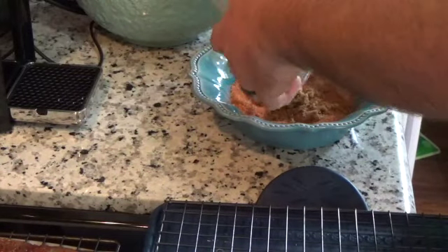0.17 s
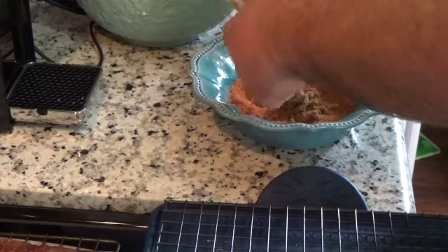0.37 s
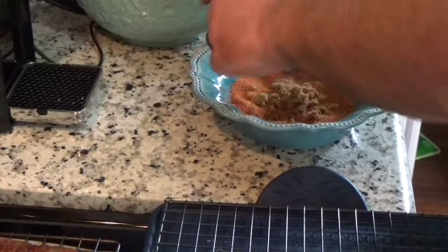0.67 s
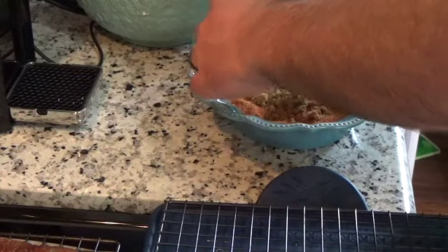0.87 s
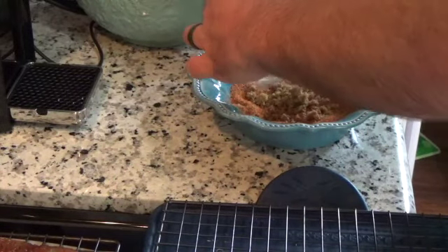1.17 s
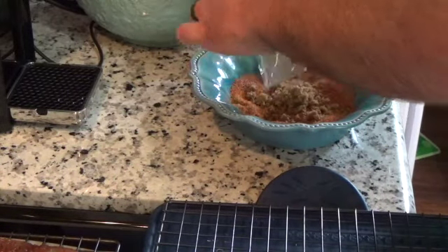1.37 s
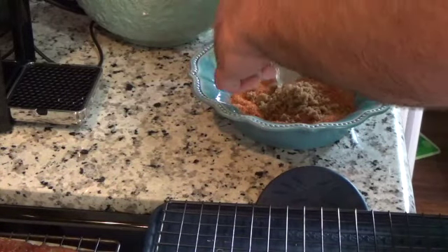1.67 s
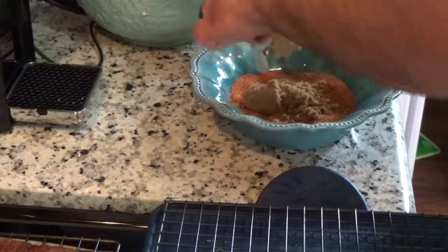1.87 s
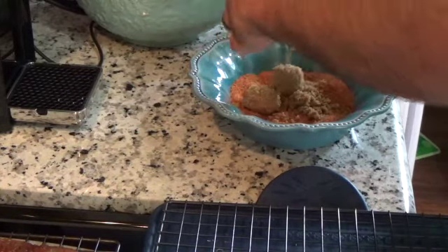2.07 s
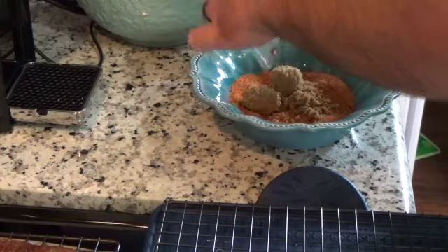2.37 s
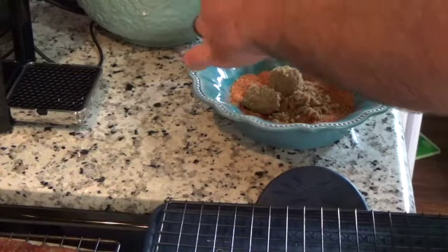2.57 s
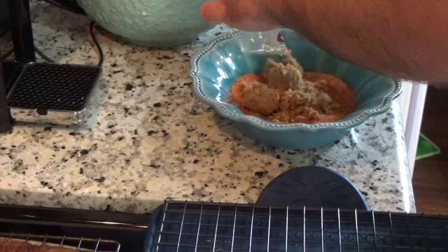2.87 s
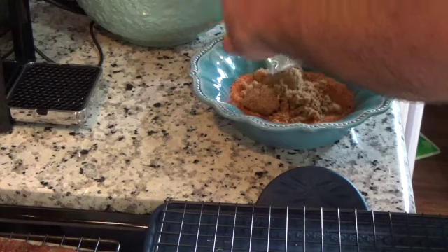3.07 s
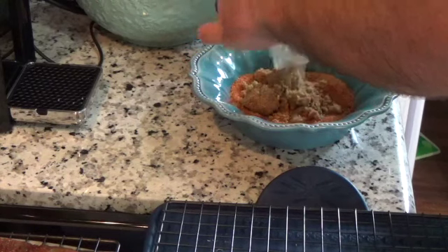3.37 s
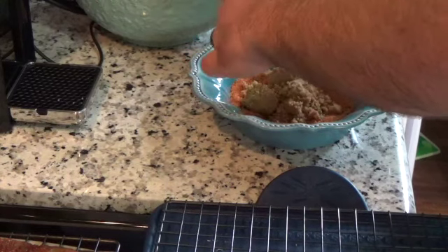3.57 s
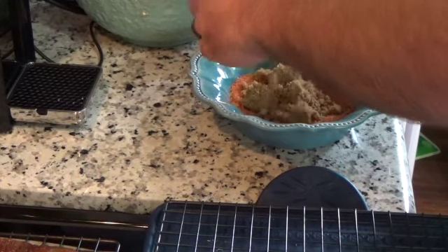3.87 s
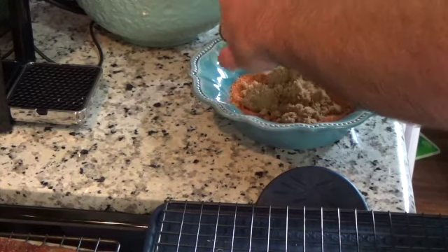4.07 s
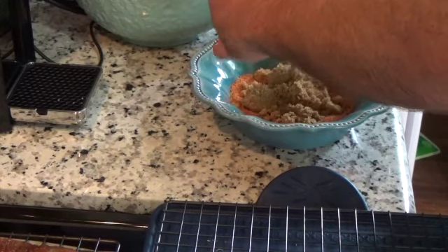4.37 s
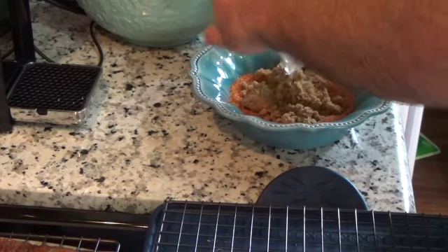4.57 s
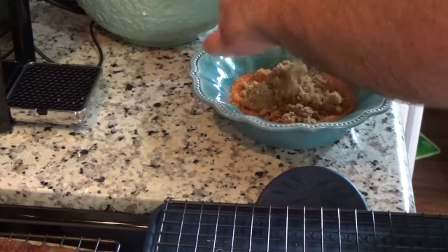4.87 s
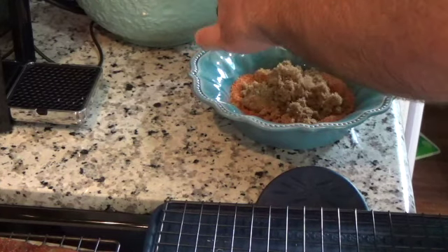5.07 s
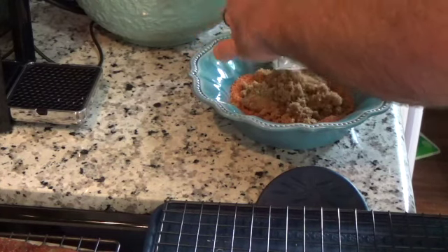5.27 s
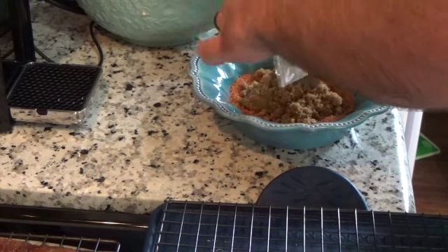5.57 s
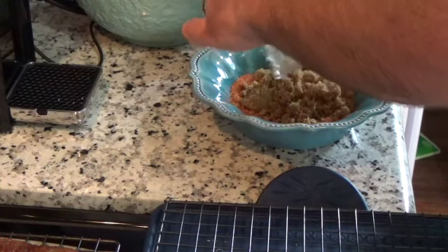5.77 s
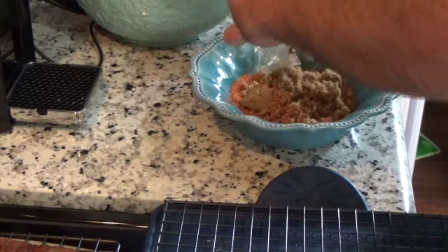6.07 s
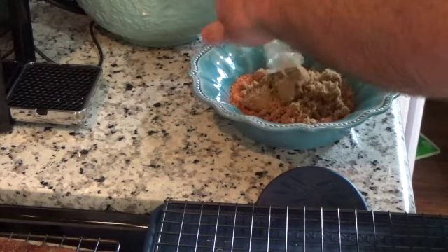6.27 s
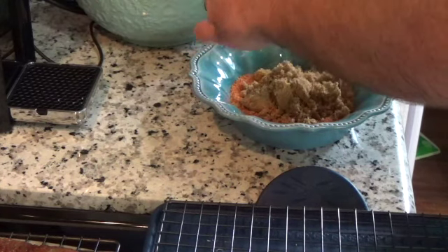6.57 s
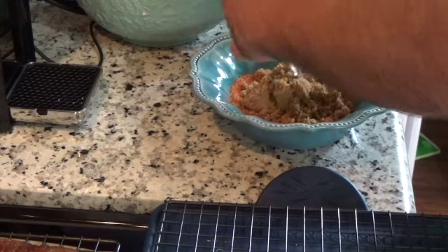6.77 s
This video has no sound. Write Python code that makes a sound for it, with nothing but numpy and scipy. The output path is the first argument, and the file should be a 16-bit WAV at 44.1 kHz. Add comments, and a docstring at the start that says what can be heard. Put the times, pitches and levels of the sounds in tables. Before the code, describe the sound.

A thin plastic bag of brown sugar is squeezed and worked by hand over a bowl. Bright dry snaps come singly and in clusters, with swarms of tiny crackles and a light sliding hiss between. Densest in the opening three seconds, then more broken up with short lulls. Close microphone in a small kitchen, faint steady appliance hum and airy room noise beneath.

```python
"""Hands kneading a bag of sugar

Hands knead a plastic bag of brown sugar over a bowl, close to a camera in a kitchen.
Creases of the film snap through as noise bursts shaped by resonances: loud ones singly, small ones in swarms.
Film slides on sugar as a hiss, the walls answer with decaying noise,
and an appliance hums and whines as wavering sines over the room's air noise."""
import sys
import numpy as np
from scipy import signal
from scipy.fft import rfft, irfft, next_fast_len
from scipy.io import wavfile
from scipy.ndimage import map_coordinates

SR = 44100
rng = np.random.default_rng(int(sys.argv[2]) if len(sys.argv) > 2 else 0)


def to_wav(s):
    """Save 16-bit WAV."""
    ch = np.atleast_2d(s).T  # columns
    pcm = np.round(np.clip(ch, -1, 1) * 32767)  # PCM
    wavfile.write(sys.argv[1], SR, pcm.astype(np.int16))


N = 305613

ROLL_HZ, TOP_HZ = 15900, 16900  # start of the weakened top treble, upper band limit
GRIP_S, LET_GO_DB_PER_S = 0.0059, 256  # rise of a squeeze's power, fall of its level after its length
REST_CRACKLE_DB, REST_SHEET_DB = -54, -60  # base levels of the bag at rest in the hands
SLIDE_DB, SLIDE_GROWS = -54.5, 0.59  # sliding hiss at rest; dB it gains per dB of crackle
CROWDING = .3  # share of a squeeze's strength that goes into more creases rather than louder ones


def amp(db):
    """Amplitude ratio of a level in dB: twenty dB are a factor of ten."""
    return 10 ** (np.asarray(db) / 20)


def unit(x):
    """Normalization of the mean power: x scaled to rms 1."""
    return x / np.sqrt(np.mean(x ** 2) + 1e-20)


def along(points, hz):
    """Interpolation of (frequency [Hz], value) points on a logarithmic frequency axis."""
    f, v = np.transpose(points)
    return np.interp(np.log(hz + 1), np.log(f + 1), v)


def wobble(rate):
    """Slow random modulation: a smooth curve through rate normal random knots a second."""
    knots = rng.standard_normal(int(N * rate / SR) + 4)
    return map_coordinates(knots, [np.arange(N) * rate / SR])


def filtered(x, response):
    """Linear filtering: the spectrum of x is multiplied by a response of frequency."""
    m = next_fast_len(x.shape[-1] + 4096)
    spectrum = rfft(x, m) * response(np.fft.rfftfreq(m, 1 / SR))
    return irfft(spectrum, m)[..., :x.shape[-1]]


def creases(s, db, hz, sheet_db, sheet_hz, snap_s, rattle_s, rattle_db, size):
    """Buckling of film, in mid and side: impulsive noise excites a bright crease and a lower sheet resonance."""
    t = np.arange(size) / SR
    f = np.fft.rfftfreq(2 * size, 1 / SR)
    stretch = np.exp(0.4 * rng.standard_normal((len(s), 1)))  # each crease decays at its own speed

    def fade(t60):
        """Exponential decay by 60 dB in t60 seconds times the crease's stretch."""
        return amp(-60 * t / (t60 * stretch))

    def shape(slow):
        """Envelope of a rapid onset, a snap and a weaker, longer rattle, tapered to zero."""
        onset = 1 - np.exp(-t / .0001 / slow)
        decay = fade(snap_s * slow) + amp(rattle_db) * fade(rattle_s * slow)
        return onset * decay * np.cos(np.pi / 2 * t / t[-1])

    def ring(center, width):
        """Response of a damped resonator with the given centre and bandwidth in Hz."""
        return 1j * f * width / (center * center - f * f + 1j * f * width)

    def burst(gain, slow):
        """Source and filter: enveloped noise, independent in mid and side, through the resonances."""
        noise = shape(slow) * rng.standard_normal((2, len(s), size))
        return irfft(rfft(noise, 2 * size) * gain)[..., :size]

    def peak(x):
        """Peak normalization: each crease scaled to a mid peak of 1."""
        return x / np.abs(x[:1]).max(axis=2, keepdims=True)

    # the crease rings at its own pitch on top of a broad crack; the sheet around it rings lower and narrower
    bright = (ring(hz[:, None], hz[:, None] / 6) + 0.69) * ring(11770, 13700)
    low = ring(sheet_hz[:, None], sheet_hz[:, None] / 7) + 0.37 * ring(1670, 2050)
    low = low * ring(1650, 5900)  # a small sheet radiates no bass
    cracks = amp(db)[:, None] * peak(burst(bright, 0.95))
    sheets = amp(sheet_db)[:, None] * peak(burst(low, 4.44))  # the sheet swings in and out more slowly
    at = (np.round(s * SR).astype(int)[:, None] + np.arange(size)).ravel()
    return np.array([np.bincount(at, p.ravel(), N + size)[:N] for p in cracks + sheets])


def snaps(count=4):
    """Snap-through instability: loud creases, each setting off a few weaker neighbours close in time."""
    # loud creases before the colour of the bag: (time [s], crack peak [dB], crack pitch [Hz],
    # sheet ring peak [dB], sheet ring pitch [Hz])
    loud_creases = [(0.001, -12, 6000, -30.5, 2285), (0.058, -6.5, 15100, -30, 3200),
                    (0.165, -22, 7180, -45, 2860), (0.192, -14.5, 5520, -60, 2780),
                    (0.2642, -23, 11000, -52, 2800), (0.3336, -25, 7600, -56, 1420),
                    (0.346, -12.5, 7100, -49, 3280), (0.407, -19, 4500, -33, 2700),
                    (0.4283, -14.5, 12400, -35, 2620), (0.4926, -18, 13100, -50, 1850),
                    (0.511, -13, 12400, -47, 2540), (0.5724, -14, 11000, -39, 1660),
                    (0.599, -10, 4040, -28, 3440), (0.6202, -16, 7500, -31, 3040),
                    (0.7424, -12, 4140, -45, 2970), (0.765, -38, 9000, -27.5, 2420),
                    (0.8103, -14, 11200, -27, 2900), (0.85, -16, 7680, -25.5, 1850),
                    (0.8783, -16, 4160, -32, 1870), (0.9377, -6, 11700, -28, 2940),
                    (0.989, -12.5, 8000, -48, 1570), (1.022, -13.5, 9800, -34, 2010),
                    (1.1567, -21, 12800, -55, 1570), (1.1876, -12.5, 6900, -30, 2300),
                    (1.229, -12, 9000, -27, 1600), (1.239, -9.5, 4000, -27, 3200),
                    (1.2907, -16, 10800, -29, 2830), (1.3242, -8.5, 12800, -24.5, 2300),
                    (1.3578, -5, 10600, -26, 3550), (1.3823, -11.5, 8000, -44, 3280),
                    (1.3982, -11, 13000, -50, 3020), (1.4142, -12, 10900, -43, 2900),
                    (1.4523, -16, 8400, -35.5, 2800), (1.494, -18.5, 4470, -38, 2720),
                    (1.5541, -5.5, 10400, -36, 3190), (1.5719, -13.5, 10500, -27, 2920),
                    (1.66, -11.5, 13400, -44, 2860), (1.712, -6, 10600, -45, 2310),
                    (1.773, -17, 11500, -49, 3300), (1.8067, -18.5, 6400, -36.5, 3020),
                    (1.9051, -24, 6900, -30, 2950), (2.038, -20.5, 4500, -45, 1370),
                    (2.0728, -18.5, 5960, -34, 1740), (2.1138, -15, 15100, -57, 1970),
                    (2.139, -20, 11000, -31.5, 2800), (2.156, -10.5, 10700, -32, 3500),
                    (2.2039, -12.5, 12200, -35, 2310), (2.2202, -17, 14300, -33, 1220),
                    (2.375, -16.5, 5800, -28.5, 2960), (2.4219, -8, 13900, -48, 2980),
                    (2.463, -18, 7150, -29.5, 1780), (2.4763, -20, 10100, -31.5, 2800),
                    (2.51, -11.5, 12400, -24.5, 2820), (2.6528, -17, 9070, -30, 2860),
                    (2.6653, -11.5, 11300, -44, 2330), (2.6852, -14, 10400, -26, 2810),
                    (2.7005, -11, 4110, -27, 3020), (2.718, -15, 4220, -26.5, 3020),
                    (2.763, -10, 4410, -25.5, 2960), (2.7857, -4.5, 12400, -23, 3100),
                    (2.85, -10.5, 12400, -29, 2200), (2.8877, -17.5, 9200, -34, 2310),
                    (2.993, -20, 5300, -32.5, 1350), (3.017, -23, 12900, -34, 2600),
                    (3.0372, -18, 6340, -34, 2940), (3.053, -10, 14400, -50, 3000),
                    (3.109, -12, 7500, -37, 3500), (3.1558, -15, 13900, -31, 2430),
                    (3.2642, -9, 5600, -24, 2730), (3.3806, -20, 10100, -37, 2300),
                    (3.4211, -17, 12100, -35, 2300), (3.4273, -18, 9000, -30, 2290),
                    (3.563, -20.5, 9850, -39, 2490), (3.7366, -22.5, 9900, -39, 3340),
                    (3.8012, -17, 7300, -34.5, 3000), (3.8486, -15.5, 7300, -52, 2320),
                    (3.887, -21, 9600, -39.5, 2970), (3.898, -18, 12300, -36, 2010),
                    (4.001, -28.5, 8000, -61, 2900), (4.051, -21, 7710, -35.5, 2300),
                    (4.0766, -17, 7400, -43, 2780), (4.082, -24.5, 8050, -37.5, 2370),
                    (4.164, -22, 11200, -62, 1180), (4.182, -31, 9000, -36, 1200),
                    (4.194, -12.5, 11900, -43, 2480), (4.2212, -15, 8050, -28.5, 2620),
                    (4.232, -13.5, 10300, -35, 2380), (4.3188, -5, 15100, -40, 1570),
                    (4.355, -17, 4470, -34, 2850), (4.382, -17, 13200, -37, 2820),
                    (4.401, -27, 9000, -32, 2330), (4.4164, -18, 8960, -26, 2420),
                    (4.4475, -12.5, 11100, -30.5, 1000), (4.6113, -6, 9600, -29.5, 2970),
                    (4.6744, -10, 15400, -30, 1040), (4.7383, -19, 12600, -35.5, 2680),
                    (4.811, -37, 6100, -33, 2760), (4.8255, -16.5, 13600, -39, 2730),
                    (4.8708, -26.5, 9100, -53, 2900), (4.9085, -30, 8820, -28, 2880),
                    (4.9251, -23, 7620, -28.5, 2270), (4.981, -22.5, 11000, -46, 2900),
                    (5.011, -16, 12600, -53, 1350), (5.0897, -21, 12200, -48, 3500),
                    (5.1011, -11.5, 11100, -57, 3140), (5.1268, -15.5, 12700, -50, 3020),
                    (5.1489, -14.5, 8400, -55, 2820), (5.2075, -20, 8900, -36, 2460),
                    (5.244, -20.5, 7360, -50, 1310), (5.275, -13.5, 10000, -32, 2020),
                    (5.3132, -14.5, 9700, -28.5, 2870), (5.394, -9.5, 15000, -36, 3070),
                    (5.408, -16, 8950, -31, 1030), (5.491, -22, 15200, -53, 1640),
                    (5.5589, -15.5, 7700, -35.5, 2380), (5.5826, -17, 9200, -37, 2350),
                    (5.608, -8.5, 12700, -59, 3000), (5.6425, -18.5, 6200, -38, 1740),
                    (5.6803, -13.5, 12700, -40, 1290), (5.769, -18, 15000, -40, 2630),
                    (5.783, -13.5, 15200, -32.5, 2970), (5.8348, -15.5, 7160, -34, 2880),
                    (5.923, -17, 7040, -50, 2590), (5.961, -27, 7000, -36, 1980),
                    (5.9847, -12, 14700, -30.5, 2670), (6.0461, -12, 7610, -23.5, 2930),
                    (6.0641, -11, 6500, -25, 2420), (6.095, -14, 14600, -31, 2920),
                    (6.131, -12.5, 4670, -32, 2280), (6.183, -19, 5500, -40, 1800),
                    (6.2358, -15.5, 7570, -46, 2310), (6.2605, -21, 7000, -59, 2900),
                    (6.2731, -13.5, 8040, -26.5, 2410), (6.3118, -17.5, 6240, -40, 2820),
                    (6.3268, -16.5, 7000, -38, 2900), (6.3644, -18, 10700, -35, 1740),
                    (6.5105, -15, 14200, -31, 3570), (6.58, -19, 8260, -37.5, 2360),
                    (6.6594, -14.5, 7300, -31.5, 1320), (6.8207, -24.5, 5600, -37, 1766),
                    (6.8494, -22, 6940, -32, 2388), (6.8865, -22, 5970, -30, 3000)]
    s, db, hz, sheet_db, sheet_hz = np.transpose(loud_creases)
    main = creases(s, db, hz, sheet_db, sheet_hz, snap_s=0.0036, rattle_s=0.053, rattle_db=-11.5, size=1536)
    wait, drop, pitch = rng.random((len(s), count, 3)).T
    lag = -.0015 - .012 * np.log(wait + 1e-9)  # seconds, mostly after the loud crease
    loss = 11 + 12 * drop + 200 * np.abs(lag)  # dB, greater farther away in time
    shift = np.exp(pitch - .5)
    rows = [np.clip(s + lag, 0, (N - 1) / SR), db - loss, np.minimum(hz * shift, 16000),
            sheet_db - loss + 10, sheet_hz / shift]
    neighbours = creases(*map(np.ravel, rows), snap_s=.005, rattle_s=.035, rattle_db=-11, size=512)
    return main + neighbours


def kneading():
    """Power addition of overlapping squeezes: each grips, holds and eases off over the resting bag."""
    # squeezes of the bag, base levels from which crease levels follow:
    # (start [s], length [s], crackle of small creases [dB], ring of the sheet [dB])
    squeezes = [(-.02, 0.23, -41, -45), (0.337, 0.031, -36, -53), (0.398, 0.14, -46, -50.5),
                (0.583, 0.09, -36.5, -41), (0.692, 0.19, -37.5, -44), (0.841, 0.14, -37.5, -40.5),
                (1.025, 0.12, -40, -54), (1.147, 0.26, -39.5, -46), (1.479, 0.11, -37.5, -44.5),
                (1.621, 0.19, -42, -49.5), (2.084, .21, -39.5, -48.5), (2.341, 0.2, -38.5, -46),
                (2.585, 0.057, -36, -43), (2.646, 0.059, -32.5, -46), (2.739, 0.088, -33.5, -43.5),
                (2.881, 0.031, -36, -44.5), (3.017, 0.09, -36.5, -46), (3.153, 0.058, -34, -43),
                (3.302, 0.2, -41, -47.5), (3.785, .04, -44, -47), (3.881, 0.026, -35.5, -66),
                (4.048, 0.042, -42, -47), (4.181, 0.055, -36.5, -42.5), (4.296, 0.22, -37.5, -46.5),
                (4.573, 0.085, -37.5, -49), (4.909, 0.079, -40.5, -55), (5.09, 0.041, -42, -46),
                (5.338, 0.098, -42, -53), (5.778, 0.059, -38, -56), (5.914, 0.085, -38, -44),
                (6.031, 0.023, -31, -38), (6.121, 0.32, -39, -47), (6.483, 0.048, -40, -60),
                (6.638, 0.073, -36, -46), (6.821, .12, -33, -45.5)]
    t = np.arange(0, N / SR + .002, .002)
    start, length, crackle_db, sheet_db = np.transpose(squeezes)
    since = t[:, None] - start
    let_go = amp(-2 * LET_GO_DB_PER_S * np.maximum(since - length, 0))
    power = np.clip(since / GRIP_S, 0, 1) * let_go

    def level_db(db, rest_db):
        """Level of the summed powers of squeezes and rest."""
        return 10 * np.log10(power @ amp(2 * db) + amp(2 * rest_db))

    return t, level_db(crackle_db, REST_CRACKLE_DB), level_db(sheet_db, REST_SHEET_DB)


def crinkle(count=1400):
    """Crackling noise and friction: swarms of small creases, clumped in time, over film sliding on sugar."""
    s, crackle_db, sheet_db = kneading()
    t = np.arange(N) / SR
    when, big, pitch, slack, panel = rng.random((count, 5)).T
    effort_db = CROWDING * (crackle_db - crackle_db.mean())
    # creases are drawn from a rate that grows with effort and wavers at random
    rate = amp(2.5 * wobble(45) + 2 * np.interp(t, s, effort_db))
    crowd = np.cumsum(rate)
    at = np.interp(when, crowd / crowd[-1], t)
    size_db = np.minimum(-4.5 * np.log(big + 1e-9), 11)  # many small, few large
    small_db = np.interp(at, s, crackle_db - effort_db) + size_db + 8
    small_sheet_db = np.interp(at, s, sheet_db - effort_db) + 0.35 * size_db + 12.5 - 12 * slack
    small = creases(at, small_db, 4000 * 4 ** pitch, small_sheet_db, 900 * 4 ** panel,
                    snap_s=0.0048, rattle_s=.03, rattle_db=-12.5, size=512)
    hiss = unit(filtered(rng.standard_normal((2, N)), lambda hz: np.minimum(hz / 2500, 1)))
    slide_db = SLIDE_DB + SLIDE_GROWS * (np.interp(t, s, crackle_db) - REST_CRACKLE_DB)
    return small + amp(slide_db + 1.3 * wobble(25)) * hiss


def kitchen(x):
    """Reverberation: convolution with noise, unrelated in mid and side, whose decay depends on frequency."""
    # absorption of the room: (frequency [Hz], time to decay by 60 dB [s])
    decay_times = [(500, 1), (3000, 0.12), (12000, 0.15)]
    hz, t, z = signal.stft(rng.standard_normal((2, SR // 2)), SR, nperseg=256)
    decay = amp(-60 * t / along(decay_times, hz)[:, None])
    tail = signal.istft(z * decay, SR, nperseg=256)[1]
    tail = tail / np.linalg.norm(tail[0])
    delayed = np.pad(x, (300, 0))  # the answer starts 300 samples late
    return signal.fftconvolve(delayed[None], tail, axes=1)[:, :N]


def appliance():
    """Tonal and broadband noise: sines unsteady in frequency and level over spectrally shaped air noise."""
    # spectrum of the air noise: (frequency [Hz], relative level per Hz [dB])
    air_spectrum = [(25, -27), (100, -20), (270, -17.5), (350, -7), (630, -10), (730, -1.5), (1010, -4.5),
                    (1200, -5.5), (3000, -10.5), (8000, -17), (16000, -17.5)]
    # motor tones in mid: (mean frequency [Hz], mean level [dB rms], scale of the frequency waver [Hz])
    motor_tones = [(118, -84.5, 5.4), (239.8, -69.5, 1.49), (1019, -59, 2.36)]
    air = unit(filtered(rng.standard_normal((2, N)), lambda hz: amp(along(air_spectrum, hz))))
    tones = 0
    for hz, db, waver in motor_tones:
        phase = 2 * np.pi * np.cumsum(hz + waver * wobble(12)) / SR
        tones = tones + np.sqrt(2) * amp(db + 0.42 * wobble(8.1)) * np.sin(phase)
    return amp(-53) * air + tones * np.array([[1], [.3]])


def scene():
    """Superposition of all sources in mid and side, turned into left and right by sum and difference."""
    # colour of the bag over counter and bowl: (frequency [Hz], gain [dB])
    bag_colour = [(300, 3), (640, -3), (1800, -1.5), (2150, -4.5), (2330, 0.5), (2600, -1), (2920, 2),
                  (3400, -1.5), (4500, 2.5), (8000, -1), (13000, -3.5)]
    # stereo width: (frequency [Hz], gain of the side signal [dB])
    side_gain = [(60, -10), (200, -20), (700, -17), (2400, -13), (8000, -15)]
    bag = filtered(snaps() + crinkle(), lambda hz: amp(along(bag_colour, hz)))
    echo = amp(-14.0) * kitchen(bag[0]) * [[1], [1.6]]
    mid, side = bag * [[1], [.8]] + echo + appliance()
    side = filtered(side, lambda hz: amp(along(side_gain, hz)))
    # a little of the mid in the side leans the whole sound to the left, less so in the bass
    side = side + filtered(mid, lambda hz: .04 * np.minimum(hz / 1500, 1))
    return np.array([mid + side, mid - side])


def record(dry):
    """Band limitation: the camera drops the top treble by 24 dB and keeps nothing above its limit."""
    return filtered(dry, lambda hz: amp(-24 * (hz > ROLL_HZ)) * (hz < TOP_HZ))


dry = scene()
out = record(dry)
to_wav(out)
```